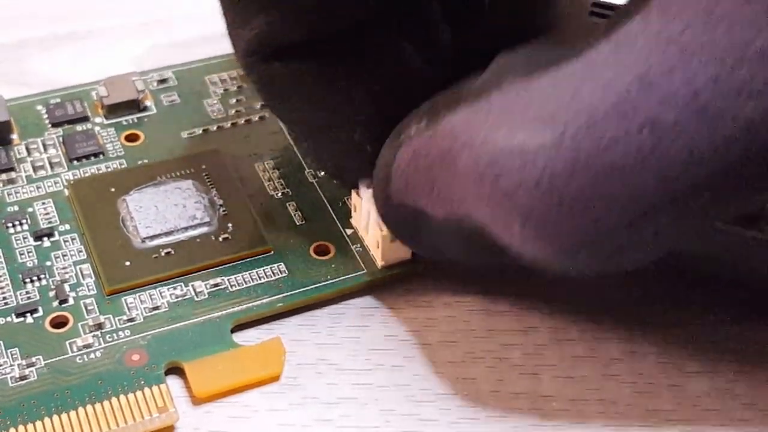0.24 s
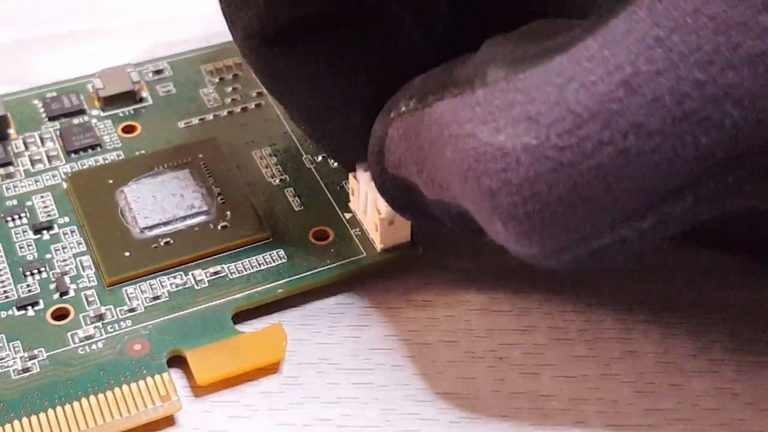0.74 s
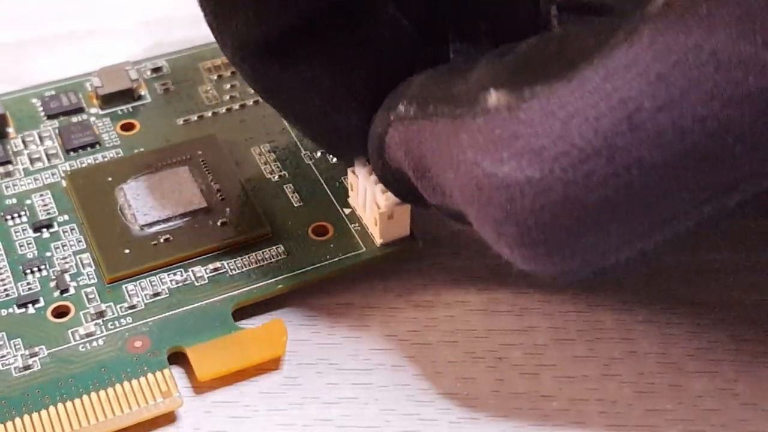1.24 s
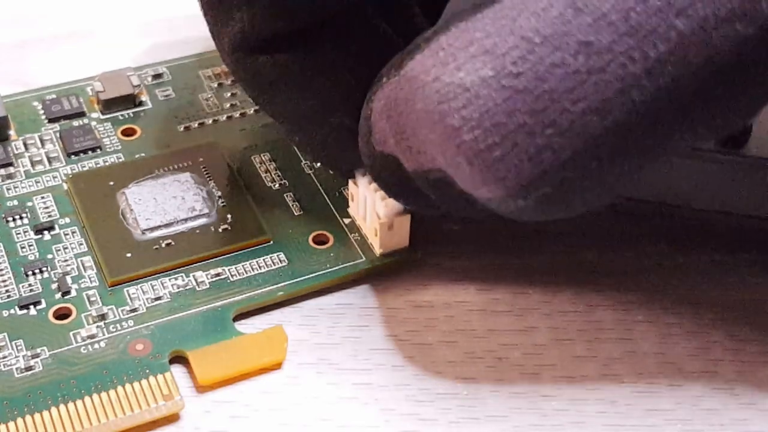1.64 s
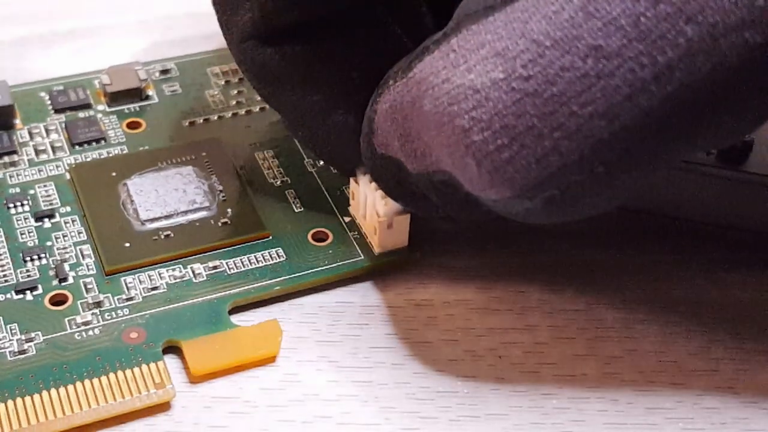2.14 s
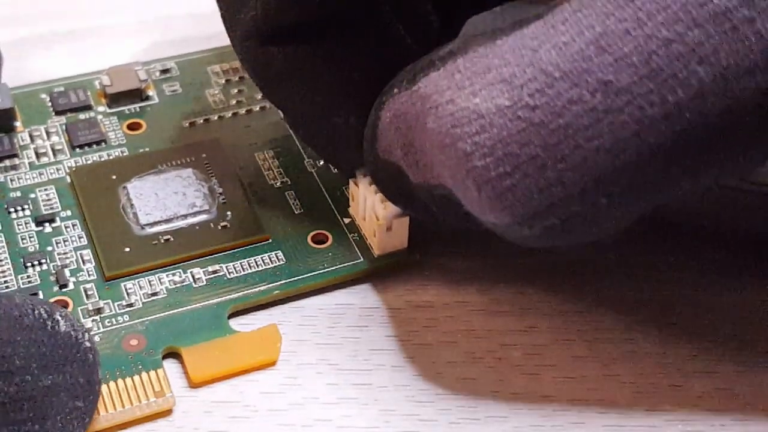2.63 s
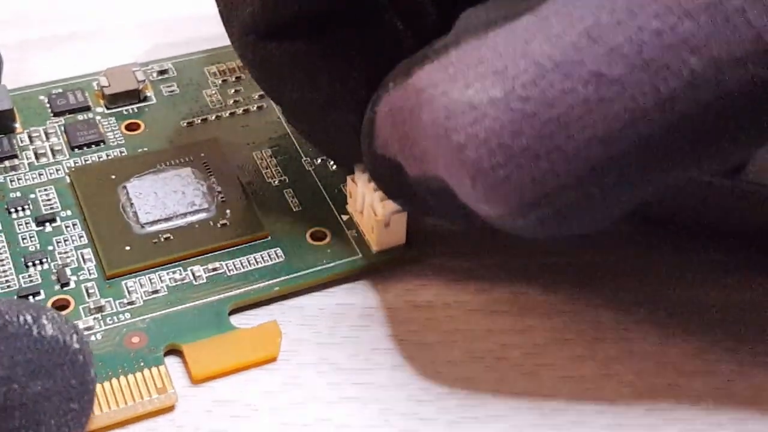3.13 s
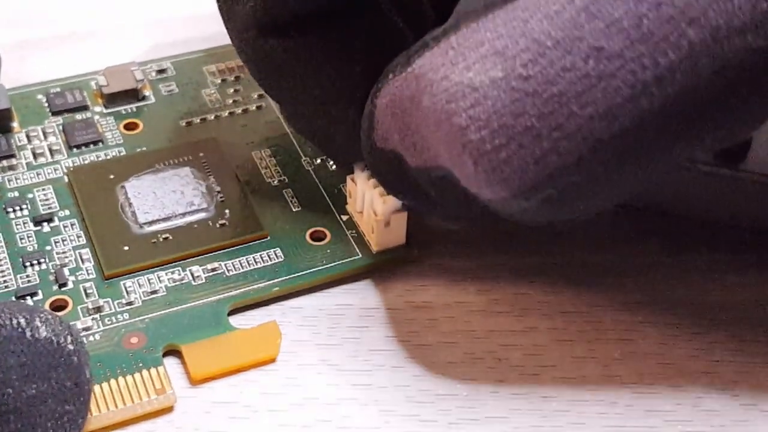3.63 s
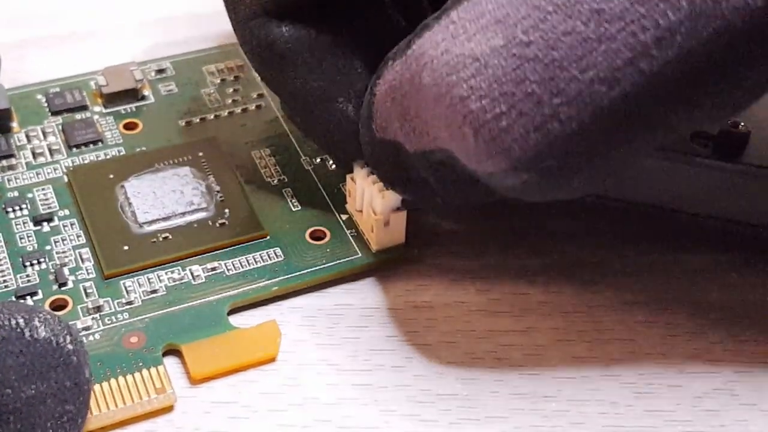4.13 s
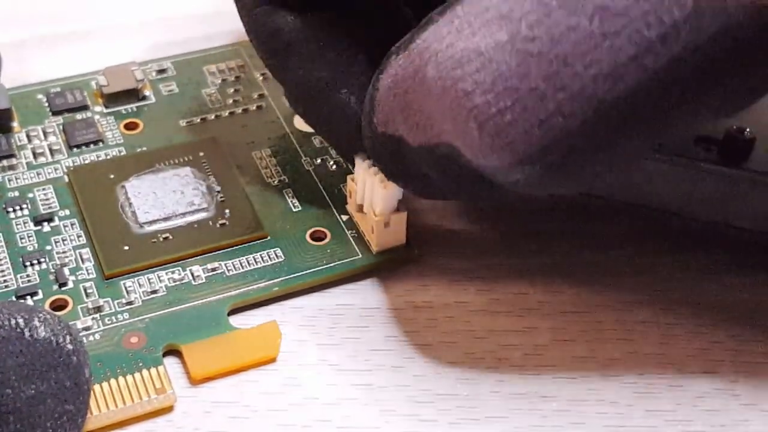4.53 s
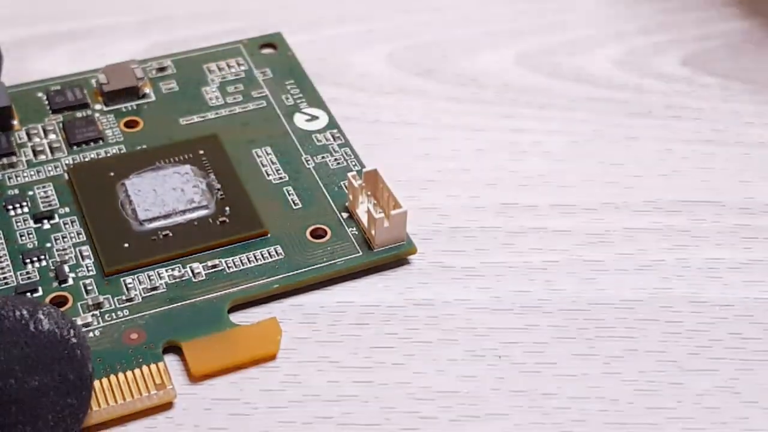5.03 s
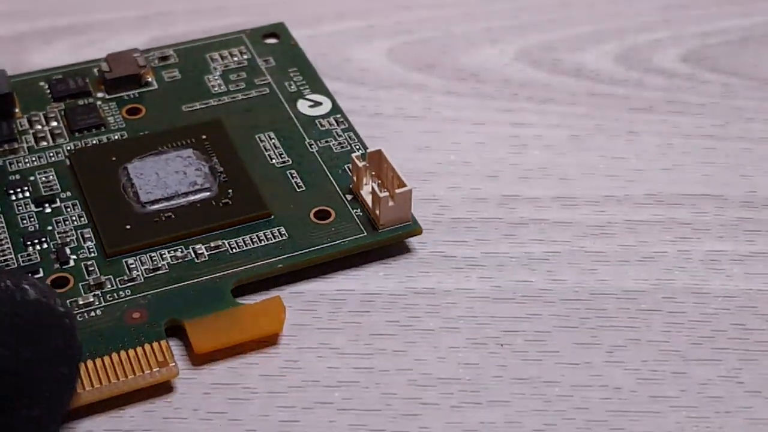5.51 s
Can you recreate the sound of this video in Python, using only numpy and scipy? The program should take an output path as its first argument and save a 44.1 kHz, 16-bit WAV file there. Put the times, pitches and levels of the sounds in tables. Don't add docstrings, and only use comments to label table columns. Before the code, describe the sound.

In a quiet room, close stereo microphones catch gloved fingers wiggling a small plastic plug in its socket: sharp dry ticks, faint creaks, gritty scrapes and soft table thumps. Near five seconds the plug drags free with a bright brushing sweep, then after a near-silent gap a circuit board lands on wood with a loud quick rattle.

```python
import sys
import numpy as np
from scipy import signal
from scipy.fft import rfft, irfft, next_fast_len
from scipy.io import wavfile
from scipy.ndimage import uniform_filter1d

SR = 44100
rng = np.random.default_rng(int(sys.argv[2]) if len(sys.argv) > 2 else 0)


def rack_gain(trim_db):
    fader = np.asarray(trim_db, float)
    return 10 ** (fader / 20)


def bounce(signal):
    frames = np.transpose(np.atleast_2d(signal))
    limited = np.clip(frames, -1, 1)
    pcm = np.round(limited * 32767).astype(np.int16)
    wavfile.write(sys.argv[1], SR, pcm)


N = 254456
OFF_DB = -120
LEFT_RIGHT = np.array([[1], [0]])


def unit(x):
    return x / np.sqrt(np.mean(x ** 2) + 1e-20)


def along(points, hz):
    f, value = np.transpose(points)
    return np.interp(np.log(hz + 1), np.log(f + 1), value)


def filtered(x, response):
    m = next_fast_len(x.shape[-1] + 2048)
    spectrum = rfft(x, m) * response(np.fft.rfftfreq(m, 1 / SR))
    return irfft(spectrum, m)[..., :x.shape[-1]]


def body(modes, scatter_db, apart_db, lag_s, left_db):
    chance = rng.standard_normal((len(modes), 3, 1))
    gains = rack_gain(scatter_db * chance[:, :1] + apart_db * chance[:, 1:])

    def response(f):
        ring = 0
        for k, ((centre, width, db), gain) in enumerate(zip(modes, gains)):
            damping = 1j * f * width
            ring = ring + (-1) ** k * gain * rack_gain(db) * damping / (centre ** 2 - f * f + damping)
        pan = rack_gain(left_db * (LEFT_RIGHT - 0.5))
        return ring * pan * np.exp(-2j * np.pi * f * lag_s * LEFT_RIGHT)

    return response


def struck(response, push_s, skid_s, rough, length_s):
    t = np.arange(round(length_s * SR)) / SR
    push = np.exp(-t / push_s)
    skid = rack_gain(-60 * t / skid_s) * rng.standard_normal(len(t))
    force = push / np.linalg.norm(push) + rough * skid / np.linalg.norm(skid)
    ring = filtered(force, response)
    return ring / np.abs(ring.mean(0)).max()


def grit(per_s, spike_db, share):
    caught = rng.random(N) < per_s / SR
    catches = caught * rack_gain(spike_db * rng.exponential(size=N)) * rng.choice([-1, 1], N)
    return np.sqrt(share) * unit(catches) + np.sqrt(1 - share) * rng.standard_normal(N)


def patchy(x, depth_db):
    z = signal.stft(x, nperseg=256)[2]
    field = uniform_filter1d(rng.standard_normal(z.shape[1:]), 3, axis=0)
    field = uniform_filter1d(field, 14, axis=1)
    return unit(signal.istft(z * rack_gain(depth_db * unit(field)), nperseg=256)[1][:, :N])


def strokes(s, rise_s, fall_s, db, rest_db):
    t = np.arange(0, N / SR, 1 / 1000)
    late = t[:, None] - s
    swell_db = db - 20 * np.where(late < 0, -late / rise_s, late / fall_s)
    power = np.sum(rack_gain(swell_db) ** 2, axis=1) + rack_gain(rest_db) ** 2
    return np.interp(np.arange(N) / SR, t, 10 * np.log10(power))


def add(out, s, sound):
    span = out[:, round(s * SR):][:, :sound.shape[1]]
    span += sound[:, :span.shape[1]]


# (frequency [Hz], density [dB per Hz])
HUSH = [(12, 2.5), (30, -11), (80, 0), (250, -11), (500, -15.5), (1900, -18), (6000, -30.5), (16000, -31)]
# (frequency [Hz], left-right likeness [0 to 1])
HUSH_ALIKE = [(30, 1), (300, 0.24), (1000, 0.011), (3000, 0.0064)]


def hush():
    def mid_side(hz):
        turn = np.arccos(np.clip(along(HUSH_ALIKE, hz), -1, 1)) / 2
        return rack_gain(along(HUSH, hz)) * [np.cos(turn), np.sin(turn)]

    mid, side = filtered(rng.standard_normal((2, N)), mid_side)
    return rack_gain(-63.5) * unit(np.array([mid + side, mid - side]))


# (frequency [Hz], time to fall 60 dB [s])
ROOM = [(150, 0.65), (1000, 0.49), (4000, 0.17), (12000, 0.13)]


def room(x, lasts):
    hz, t, z = signal.stft(rng.standard_normal((2, SR // 2)), SR, nperseg=256)
    z = z + z.sum(0) * (3 / (1 + (hz / 450) ** 4))[:, None]
    z = z / np.sqrt(np.mean(np.abs(z) ** 2, axis=(0, 2)))[:, None]
    decay = rack_gain(-60 * t / lasts / along(ROOM, hz)[:, None])
    tail = signal.istft(z * decay, SR, nperseg=256)[1]
    late = np.pad(x.mean(0), (150, 0))[None]
    return signal.fftconvolve(late, tail / np.linalg.norm(tail[0]), axes=1)[:, :N]


# (time [s], peak level [dB], thud [dB], edge crack [dB])
LANDING = [(5.6148, -46, -20, -6), (5.6172, -30, 2, 5), (5.621, -35, 1, -2), (5.628, -28.5, 16, 5),
           (5.6318, -28, 14.5, 6), (5.6345, -22.5, -3, 11.5), (5.6376, -20.5, -3.5, 3),
           (5.641, -38.5, 16, -5), (5.644, -31.5, 6, -15), (5.652, -46.5, 23.5, -8), (5.6579, -45, 22, -8),
           (5.662, -52, -3, 4), (5.6664, -27.5, -5, -4), (5.6695, -30.5, 6, 7), (5.672, -31.5, 4, 1),
           (5.68, -48, 9, -8), (5.688, -51, 15, -6), (5.7251, -64, 3, 3)]
# (frequency [Hz], width [Hz], level [dB])
BOARD = [(105, 23, -5.5), (150.5, 8.8, -2), (258, 47, -3.5), (343, 47, -8.5), (418, 37, 10), (521, 45, 6),
         (672, 64, 0.5), (769, 110, 1), (940, 150, 1), (1136, 45, 2), (1233, 45, -3), (1600, 990, 3),
         (2170, 66, 9), (2490, 60, 1), (3500, 200, 1), (4900, 1100, -2.5), (6100, 2600, -7)]
# (frequency [Hz], width [Hz], level [dB])
RIM = [(6260, 4600, -0.5), (11300, 6900, -7)]


def landing():
    out = np.zeros((2, N))
    for s, db, thud_db, crack_db in LANDING:
        boom = struck(body(BOARD[:4], 1.8, 1.0, 0.0001, -1.1), 0.0004, 0.0082, 1.8, 0.15)
        thud = struck(body(BOARD[4:11], 2.0, 2.7, 0.00019, 0.91), 0.00024, 0.0066, 2.7, 0.12)
        clack = struck(body(BOARD[11:], 2.4, 4.8, 0.00032, -7.0), 4e-5, 0.008, 1.6, 0.05)
        crack = struck(body(RIM, 0, 2.4, 0.000311, -3.5), 3e-5, 0.0057, 1.3, 0.03)
        add(out, s, rack_gain(db + thud_db - 11) * boom)
        add(out, s, rack_gain(db + thud_db - 5) * thud)
        add(out, s, rack_gain(db - 0.5) * clack)
        add(out, s, rack_gain(db + crack_db - 5) * crack)
    return out


# (time [s], peak level [dB])
THUMPS = [(0.788, -57), (1.453, -61), (1.747, -43.5), (1.786, -57.5), (3.643, -61), (4.088, -54.5),
          (4.305, -55), (4.551, -48), (4.861, -59), (5.089, -58), (5.17, -52), (5.261, -57)]
# (frequency [Hz], width [Hz], level [dB])
TABLE = [(91.8, 13.7, -0.5), (148.6, 13.4, 6.5), (232.6, 25, 0), (274.2, 17.3, -1), (327, 33, -2.5),
         (418, 66, -6.5), (532.5, 62, -8.5), (680, 137, -10.5), (970, 1600, -20)]


def thumps():
    out = np.zeros((2, N))
    for s, db in THUMPS:
        thump = struck(body(TABLE[:2], 2.2, 0.71, 0.00026, -0.27), 0.0018, 0.008, 0.36, 0.16)
        add(out, s, rack_gain(db) * thump)
    return out


# (peak time [s], rise [s], fall [s], level [dB])
SQUEEZES = [
    (1.93, .04, .04, -72),
    (2.03, .08, .1, -66),
    (2.09, .1, .1, -61),
    (2.16, .08, .06, -66),
]
# (frequency [Hz], width [Hz], level [dB])
STIFF = [(2350, 200, -6), (3090, 220, 0), (4800, 500, -11), (8600, 700, -12)]


def squeeze():
    strength_db = strokes(*np.transpose(SQUEEZES), OFF_DB)
    rub = filtered(grit(500, 2.2, 0.4), body(STIFF, 0, 1.5, 0.0003, -1.5))
    return rack_gain(strength_db) * patchy(rub, 2.5)


# (peak time [s], rise [s], fall [s], plug level [dB], table level [dB])
ROCKS = [(.24, 0.61, 0.11, -73.5, -71), (0.381, 0.084, 0.026, -54.5, -53.5),
         (0.694, 0.009, 0.011, -49.5, -43), (.8, 0.017, 0.25, -60, -62), (0.916, 0.043, 0.018, -57.5, -69),
         (1.058, 0.028, 0.6, -86, -65.5), (1.23, 0.089, 0.066, -68.5, -66), (1.403, 0.047, 0.1, -51, -64),
         (1.454, 0.063, 0.02, -43, -42), (1.749, 0.0028, 0.0077, -41.5, -45.5),
         (2.085, 0.15, 0.14, -72, -81), (2.17, 0.55, 0.094, -72, -58.5), (2.36, 0.16, 0.086, -69.5, -71),
         (2.597, 0.014, 0.012, -56.5, -71), (2.931, 0.47, 0.046, -74, -74.5),
         (3.053, 0.013, 0.088, -68.5, -67), (3.345, 0.03, 0.037, -55.5, -54.5),
         (3.615, 0.051, 0.035, -62, -84), (3.804, 0.02, 0.058, -63, -60),
         (4.092, 0.056, 0.026, -58.5, -60.5), (4.28, 0.059, 0.081, -59, -56), (4.467, .06, 0.065, -65, -70),
         (4.556, 0.011, 0.012, -54, -59), (4.707, 0.029, 0.027, -48, -60)]
SWEEP = [
    (4.882, 0.074, 0.068, -55.5, -58),
    (4.957, 0.03, 0.1, -49.5, -49),
    (5.085, 0.067, 0.098, -75, -47.5),
    (5.116, 0.031, 0.067, -71, -51),
    (5.16, .05, 0.055, -74, -54),
    (5.55, 0.044, 0.13, -60.5, -68),
]
# (peak time [s], rise and fall [s], pins level [dB], spring level [dB])
SLIDES = [(.378, 0.054, -63.5, -67), (.579, 0.12, -74, -73), (.693, 0.014, -59, -81), (.8, .06, -86, -84),
          (.902, 0.077, -62.5, -71), (.985, 0.026, -61, -62), (1.058, 0.044, -67.5, -97),
          (1.23, 0.057, -70, -75), (1.385, 0.031, -54, -61), (1.42, .05, -58, -68),
          (1.456, 0.047, -56, -58), (1.798, 0.066, -81, -76), (2.085, 0.2, -75, -91),
          (2.17, 0.062, -80, -90), (2.36, 0.054, -71, -76), (2.634, 0.05, -73, -73),
          (2.963, 0.043, -73, -74), (3.053, .03, -70, -78), (3.21, 0.086, -75, -77),
          (3.34, 0.046, -70, -63), (3.427, 0.074, -73.5, -86), (3.617, 0.077, -71.5, -75),
          (3.785, 0.053, -67, -68), (4.092, 0.13, -75, -75.5), (4.268, 0.075, -64.5, -62.5),
          (4.318, 0.017, -57, -86), (4.467, 0.13, -73, -76), (4.6, 0.061, -77, -74),
          (4.75, 0.092, -73, -71.5)]
BRUSH = [(4.884, 0.059, -56, -67), (4.92, 0.036, -50, -59), (4.96, 0.094, -49, -74),
         (5.02, 0.076, -56.5, -71), (5.086, 0.09, -43.5, -62), (5.149, 0.084, -52.5, -65),
         (5.24, 0.17, -59.5, -80), (5.443, 0.07, -62.5, -78)]


def effort():
    s, rise, fall, plug_db, table_db = np.transpose(ROCKS + SWEEP)
    at, span, pins_db, spring_db = np.transpose(SLIDES + BRUSH)
    table_lazy, spring_lazy = 1.04, 0.92
    hold_db = -74.5
    return [strokes(s, table_lazy * rise, table_lazy * fall, table_db, hold_db),
            strokes(s, rise, fall, plug_db, OFF_DB),
            strokes(at, span, span, pins_db, OFF_DB),
            strokes(at, spring_lazy * span, spring_lazy * span, spring_db, OFF_DB)]


# (time [s], length [s], boost or, if negative, dip [dB])
SKIDS = [(0.686, 0.0018, 10.5), (4.696, 0.0047, 9.5), (4.875, 0.0032, 3.5), (4.891, 0.0013, 9),
         (4.907, 0.0059, -26), (4.916, 0.0044, 11.5), (4.933, 0.0045, -33), (4.937, 0.0029, 13),
         (4.943, .002, -2), (5.057, 0.0074, -4)]
# (table, plug, pins, spring) levels [dB]
REST_DB = (-82, -82, -90, -88)
# (frequency [Hz], width [Hz], level [dB])
PLUG = [(1500, 500, -14), (2180, 160, -5), (2780, 260, 0), (3100, 200, -9), (4250, 500, -13),
        (5400, 400, -13), (6600, 900, -18)]
PINS = [(5450, 90, -9), (7100, 90, -7), (8210, 70, -2), (9110, 60, 0), (9450, 70, -1), (10200, 90, 1),
        (10680, 60, 1), (11000, 60, -3), (11400, 80, 2), (13400, 80, -2)]
SPRING = [(12450, 260, 0), (12850, 160, -11), (13400, 110, -15)]
# (frequency [Hz], density [dB per Hz])
CLOTH = [(500, -11.5), (1400, -2), (3000, 2), (6000, 2), (7700, -15), (11000, -5.5), (13500, -5),
         (16000, -20)]


def rubbing():
    t = np.arange(N) / SR
    skid_db = sum(db * np.exp(-((t - at) / length) ** 2) for at, length, db in SKIDS)
    table, plug, pins, spring = [rack_gain(db + skid_db) * np.clip((db - rest) / 8, 0, 1)
                                 for db, rest in zip(effort(), REST_DB)]
    catches = grit(450, 2.2, 0.6)

    wood = filtered(catches + rng.standard_normal(N), body(TABLE[2:], 0, 3.0, 0.000069, -0.052))
    deep = filtered(catches + rng.standard_normal(N), body(TABLE[:2], 0, 1.0, 0.00028, 0.022))
    plastic = filtered(catches, body(PLUG, 0, 1, 9.8e-4, -7))
    metal = filtered(grit(400, 2.5, 0.3), body(PINS, 0, 1.5, 1.1e-4, -3))
    contact = filtered(grit(500, 2.5, 0.5), body(SPRING, 0, 2.4, 0.00016, 1))
    out = rack_gain(-1.53) * table * patchy(wood, 4.2) + rack_gain(-10) * table * unit(deep)
    out += rack_gain(1.2) * plug * patchy(plastic, 2)
    out += rack_gain(-1) * pins * patchy(metal, 3.8) + rack_gain(2.5) * spring * patchy(contact, 3)

    def hiss(f):
        tilt = rack_gain(along(CLOTH, f) + [[-1.5], [1.5]])
        return tilt * np.exp(-2j * np.pi * f * 0.00011 * LEFT_RIGHT)

    cloth = grit(760, 2.8, 0.15) + 0.062 * catches + 1.6 * rng.standard_normal((2, N))
    cloth_level = rack_gain(-7) * pins + rack_gain(-11.5) * plug + rack_gain(-11) * table
    return out + cloth_level * patchy(filtered(cloth, hiss), 3)


# (time [s], peak level [dB], centre frequency [Hz])
CRACKS = [(0.2684, -38, 4000), (.6882, -54, 4000), (0.7853, -48, 6500), (3.4146, -41, 6000),
          (1.449, -26.5, 4300), (1.7457, -27.5, 4200), (1.746, -33.5, 6000), (3.644, -45, 6000),
          (1.7842, -35, 3980), (3.009, -41, 6000), (3.1644, -38, 4200), (3.6425, -35, 4160),
          (3.8444, -52, 3770), (4.3075, -42, 4060), (4.5489, -35.5, 4240), (4.7005, -37, 4500),
          (4.9361, -36, 5000)]
# (time [s], peak level [dB])
CHATTER = [(0.3454, -42), (0.353, -46), (.3765, -42.5), (0.824, -48), (.8312, -50), (0.8958, -53),
           (.9011, -54), (0.9066, -52), (0.911, -42), (.9185, -54), (0.925, -53), (.9275, -62),
           (1.3666, -49), (1.373, -47), (1.379, -50), (1.383, -45), (1.39, -49), (1.396, -49), (1.404, -42),
           (1.4116, -42), (1.4165, -49), (1.421, -40), (1.428, -41), (1.432, -42), (1.4401, -36),
           (1.455, -36.5), (3.341, -47), (3.3503, -43), (3.3558, -48), (3.3607, -49), (3.327, -50),
           (3.374, -48), (3.7989, -56), (3.8147, -50), (3.8293, -55), (4.2405, -54), (4.244, -56),
           (4.249, -56), (4.2632, -46.5), (4.2684, -50), (4.272, -45), (4.2777, -47), (4.281, -54),
           (4.2894, -45), (4.293, -50), (4.305, -36), (4.8747, -46), (4.878, -58), (4.8905, -56),
           (4.916, -53), (4.9414, -45), (4.947, -39), (4.9627, -56), (5.047, -60), (5.0656, -53),
           (5.078, -54), (5.0864, -58), (5.098, -56), (5.116, -42.5), (5.125, -54), (5.1463, -58)]


def cracks():
    out = np.zeros((2, N))
    edges = [(*row, 4) for row in CRACKS]
    edges += [(*row, 4300, 12) for row in CHATTER]
    for s, db, hz, latch_db in edges:
        edge = [(1000, 1300, -6), (hz, 3400, 0), (2790, 330, latch_db)]
        crack = struck(body(edge, 0.82, 6.6, 0.00025, -11), 4.5e-5, 0.0017, 0.39, 0.012)
        add(out, s, rack_gain(db) * crack)
    return out


# (time [s], peak level [dB], table knock [dB], pin ring [dB], latch frequency [Hz])
SNAPS = [(0.2668, -41, -13, -12.5, 2940), (0.3475, -45, -20, -18, 2780), (0.6885, -32.5, -18, -20, 2730),
         (0.786, -26, -8, -42, 2800), (0.8214, -46, -23, -21, 2530), (0.8942, -44.5, -3, -18, 2700),
         (1.0613, -45, -34, -23, 2700), (1.1821, -46, -4.5, -15, 2650), (1.401, -37.5, -28, -8, 2770),
         (1.4372, -36, -15, -30, 2700), (1.4502, -35.5, -21, -23, 2040), (1.4588, -38, -1, -22, 2180),
         (1.7464, -33, -2.5, -12, 2840), (1.7856, -41.5, -3, -8, 2430), (2.589, -43.5, -28, -26, 1400),
         (3.0091, -36.5, -8, -18, 2950), (3.1652, -46, -4.5, -22, 2920), (3.3445, -49, -11, -17, 2950),
         (3.4144, -34.5, -10, -18, 2900), (3.6441, -41, -3.5, -9, 2880), (3.8444, -37, -8.5, -15, 2940),
         (4.0876, -39.5, -1.5, -3, 2750), (4.3058, -29, -11.5, -14, 2940), (4.5497, -32.5, -9, -6.5, 2900)]
TAPS = [(0.081, -56, 3, 1, 2290), (.179, -48, -3.5, -4, 1560), (.245, -55, -18, 3, 3460),
        (1.0192, -40, -40, -2, 2860), (1.052, -51, -29, 9.5, 2230), (1.1023, -43, -17, -13, 2590),
        (1.937, -52.5, -4, -10, 2270), (2.0852, -45, -21, -18, 1540), (2.701, -53, -5, -10, 1020),
        (2.9182, -49.5, -19, -11, 2500), (4.159, -48, -27, -11, 1290), (4.206, -51.5, -24, -22, 2230),
        (4.6993, -37.5, -8, -2.5, 2630), (4.7043, -46, -32, -6, 2170), (4.7187, -43, -14, 4.5, 4940),
        (4.7312, -45.5, -19, -27, 4800), (4.9363, -42, 5, 0, 2850), (5.5346, -40.5, -35, -27, 2480),
        (5.5379, -38, -37, -28, 1910), (5.5622, -35, -18, -15, 1250)]
# (time [s], peak level [dB], latch frequency [Hz])
CREAKS = [(0.034, -50, 1880), (0.123, -49.5, 2100), (0.2077, -48, 2770), (0.4708, -54, 2120),
          (0.628, -51, 2190), (0.9733, -52, 2670), (1.187, -50.5, 2550), (3.313, -52, 2250),
          (3.614, -48, 2730), (3.791, -51, 2190), (4.224, -47.5, 1500), (4.37, -50, 2740),
          (4.644, -48, 2670)]
# (frequency [Hz], width [Hz], level [dB])
PLATE = [(760, 310, 3), (1400, 770, 0), (1870, 360, 0)]
HOUSING = [(2180, 150, 0), (5400, 900, -7)]
AIR = [(10000, 4400, 0)]


def ticks():
    out = np.zeros((2, N))
    latch, tap = (-9, 0.0004), (5, 0.0002)  # (left minus right [dB], left after right [s])
    held_hz, soft_hz = 330, 800
    slips = [(*row, *latch, held_hz) for row in SNAPS]
    slips += [(*row, *tap, soft_hz) for row in TAPS]
    slips += [(s, db, -5, -10, hz, *latch, soft_hz) for s, db, hz in CREAKS]
    for s, db, knock_db, ping_db, snap_hz, pan_db, lag_s, wide_hz in slips:
        shell_db = 0.54 * min(db + 44, 0)
        flex = struck(body(PLATE, 0, 1.6, 0.00045, 0.5 * pan_db), 4e-5, 0.055, 1.0, 0.02)
        snap = struck(body([(snap_hz, wide_hz, 4)], 0, 3, lag_s, pan_db), 9e-5, 0.007, 0.6, 0.03)
        shell = struck(body(HOUSING, 2, 4, lag_s, pan_db), 5e-5, 0.007, 0.8, 0.03)
        knock = struck(body(TABLE, 2.9, 1.4, 0.00039, -0.58), 0.00013, 0.0076, 0.74, 0.056)
        ping = struck(body(PINS[1:] + SPRING, 6, 3, 0.00024, 0.5 * pan_db), 2e-5, 0.005, 1, 0.04)
        spark = struck(body(AIR, 0, 3.6, 0.00013, 0.5 * pan_db), 2e-5, 0.0016, 0.75, 0.02)
        add(out, s, rack_gain(db - 20) * flex)
        add(out, s, rack_gain(db - 1.5) * snap)
        add(out, s, rack_gain(db - 10 + shell_db) * shell)
        add(out, s, rack_gain(db + knock_db - 6.5) * knock)
        add(out, s, rack_gain(db + ping_db - 10) * ping)
        add(out, s, rack_gain(db + ping_db + 2.5) * spark)
    return out


def scene():
    hands = rubbing() + ticks() + thumps() + cracks()
    board = landing()
    echo = rack_gain(-15.5) * room(hands, 0.65) + rack_gain(-10) * room(board, 1.48)
    return hands + board + echo + hush() + squeeze()


def band_limit(x):
    return signal.sosfilt(signal.butter(12, 16500, fs=SR, output="sos"), x)


def record(dry):
    mix = filtered(dry, lambda f: 1 / (1 + (f / 15780) ** 200))
    return band_limit(mix)


dry = scene()
out = record(dry)
bounce(out)
```